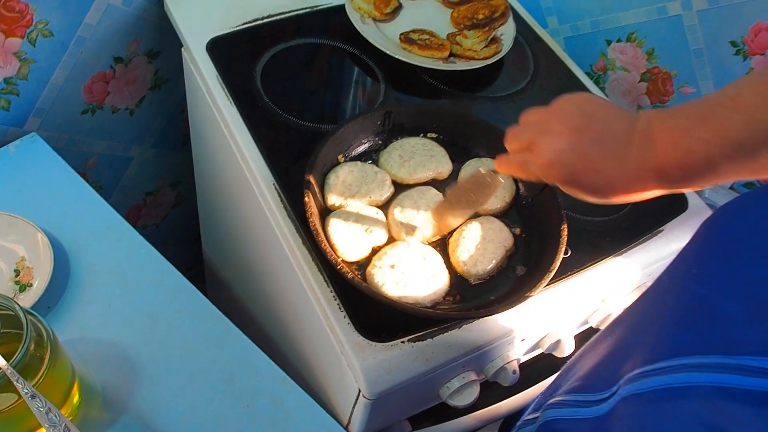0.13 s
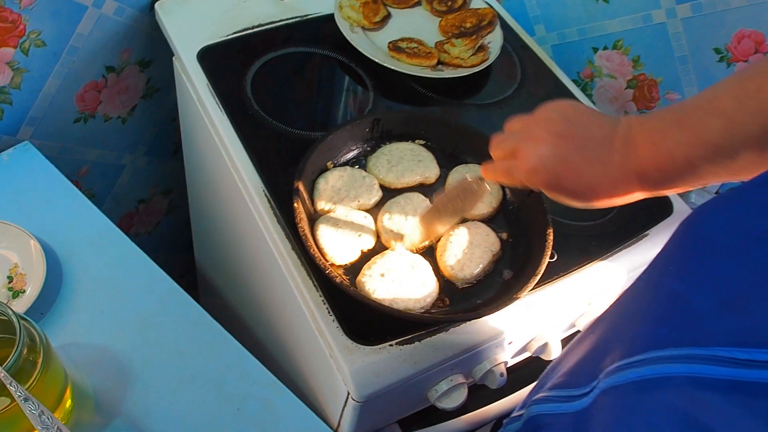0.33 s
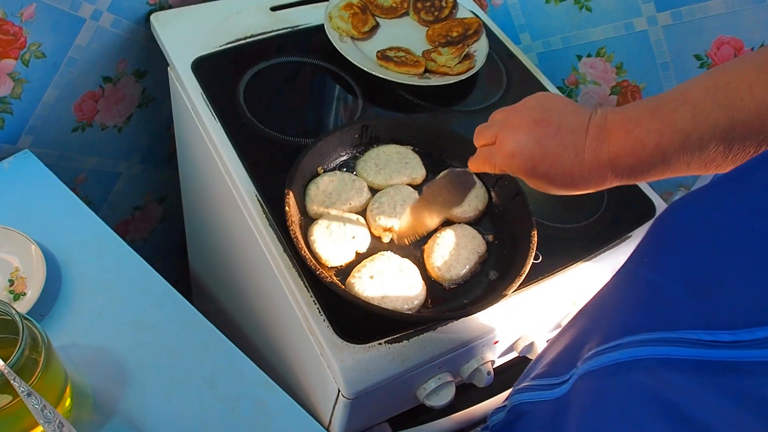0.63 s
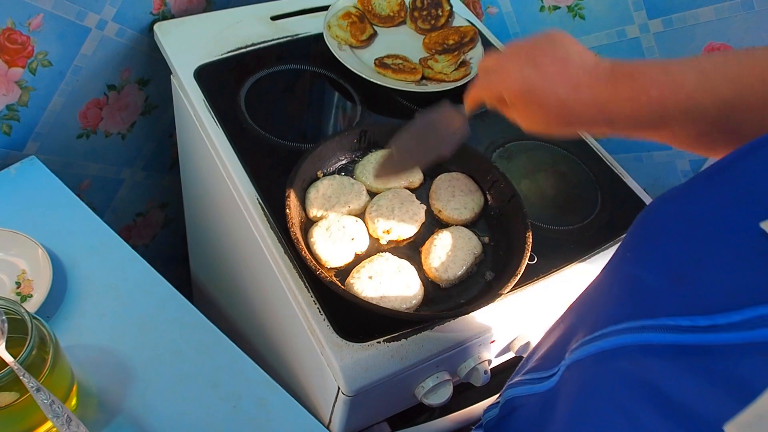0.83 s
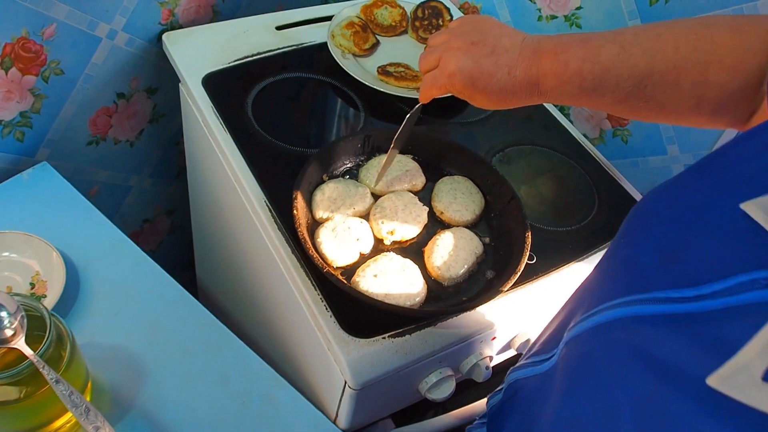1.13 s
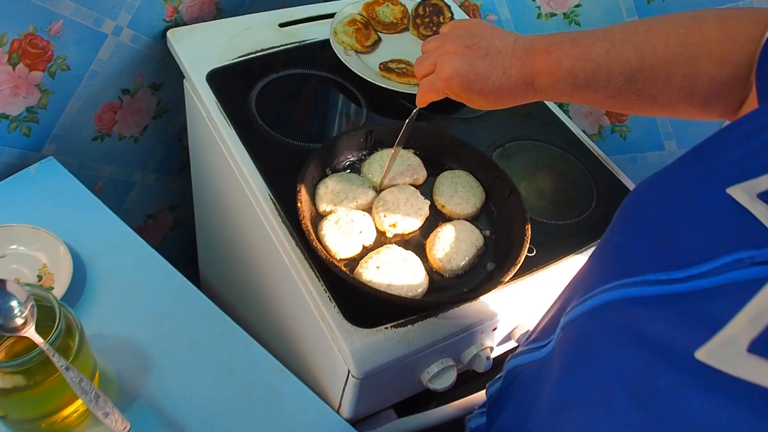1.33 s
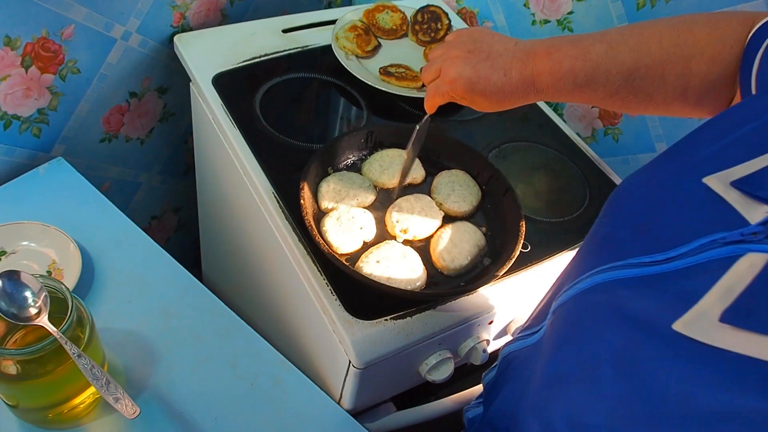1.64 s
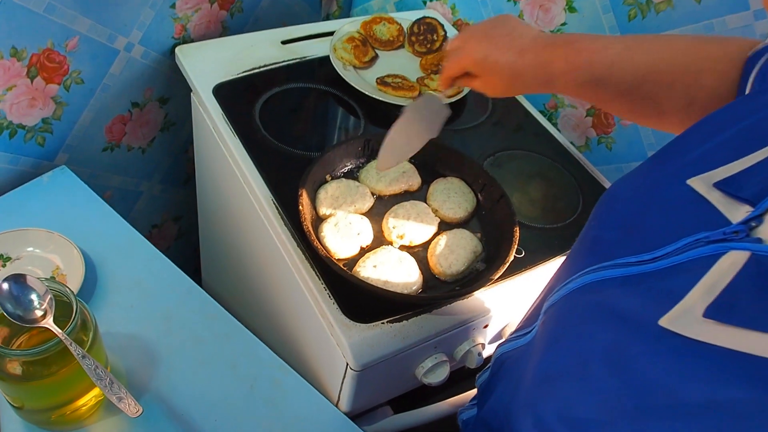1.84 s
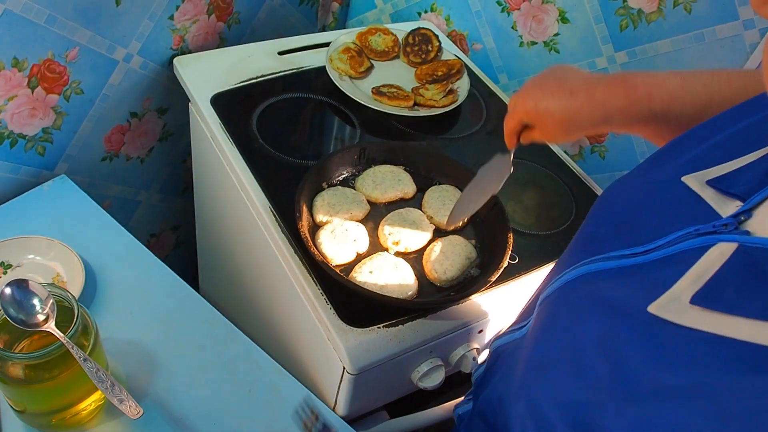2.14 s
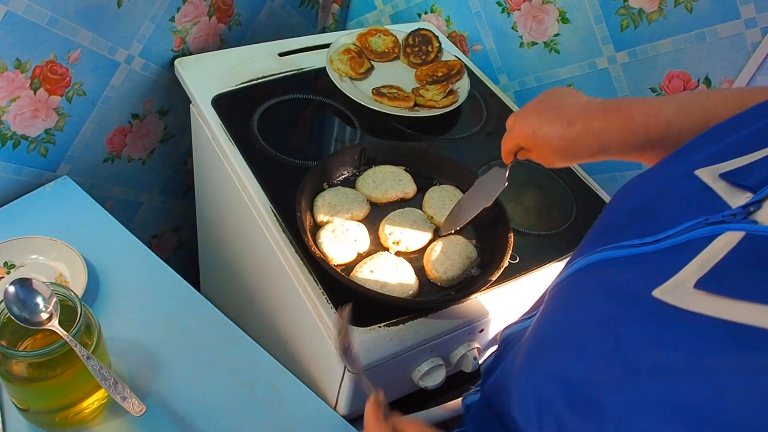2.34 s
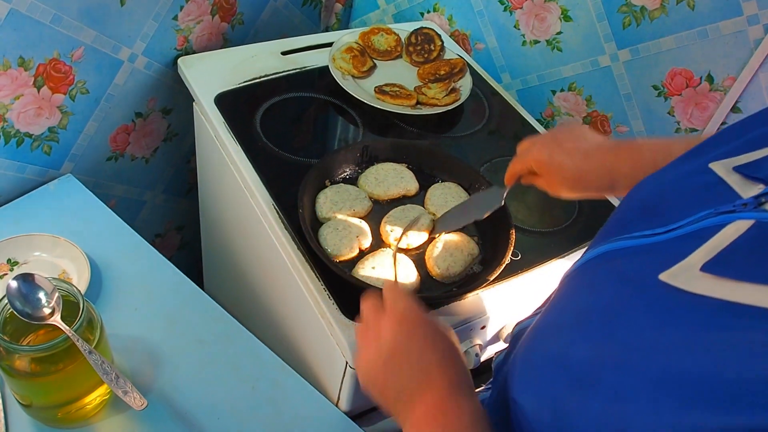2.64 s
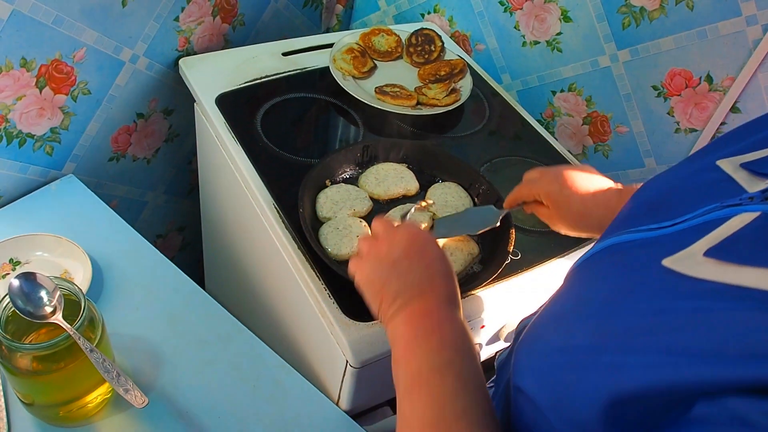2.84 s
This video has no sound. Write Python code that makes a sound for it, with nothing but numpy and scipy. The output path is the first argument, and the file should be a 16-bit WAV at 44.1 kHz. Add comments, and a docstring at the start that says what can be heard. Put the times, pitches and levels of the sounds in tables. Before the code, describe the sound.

Oil crackling in a metal frying pan, with light spatula scrapes and a utensil clink.

```python
"""A small hard kitchen, a stereo microphone close to the stove, where batter fries in a metal pan of oil.
Steam bubbles burst as sharp pops over a dense fine sizzle. A spatula scrapes to and fro and makes the pan
ring, knocks it once and slides; two utensils clink. Each sound comes back from the stove top and the
walls within a few milliseconds, and a quiet steady background lies under it all."""
import sys
import numpy as np
from scipy import signal
from scipy.fft import rfft, irfft
from scipy.io import wavfile
from scipy.ndimage import uniform_filter1d

SR = 44100
rng = np.random.default_rng(int(sys.argv[2]) if len(sys.argv) > 2 else 0)


def store_pcm(level_fs):
    """Save levels as 16-bit WAV."""
    pcm = np.round(np.clip(level_fs, -1, 1) * 32767).astype(np.int16)
    wavfile.write(sys.argv[1], SR, np.atleast_2d(pcm).T)


N = 132300  # 3 s

BODY_HZ, BODY_WIDTH_HZ = 3800, 1820  # the duller part of a bubble's burst
# Loud bubbles in the oil, close to the microphone.
# Each row: start in seconds, treble peak in dB, body level against the treble in dB.
POPS = [(0.092, -8.5, -17), (0.1296, -5, -15), (0.176, -12, -14), (0.2227, -7, -23), (0.2571, -9.5, -5),
        (0.276, -6.5, -15), (0.302, -9.5, -33), (0.3509, -7.5, -3), (0.3828, 0.5, -11), (0.491, -7.5, -19),
        (0.6518, -9.5, -3), (0.733, -10, -13), (0.8548, -15, -16), (0.8978, -14, -16), (0.9817, 0, -14),
        (1.059, -7, -17), (1.0786, -3, -19.5), (1.2335, -10.5, -2), (1.393, -14, -12), (1.4223, -11, -9),
        (1.4638, -10, -16), (1.505, -8, -11), (1.5506, 0.5, -19), (1.5959, -1.5, -14), (1.62, -7.5, -9.5),
        (1.715, -13.5, -7.5), (1.7654, -15.5, -3.5), (1.774, -9, -9), (1.798, -12.5, -7),
        (1.8502, -5, -9.5), (1.8665, -8, -16), (1.895, -14.5, -8), (1.9151, -9, -15), (1.989, -14, -10),
        (2.004, -14, -28), (2.035, -12, -7.5), (2.0791, -10, -22), (2.1496, -14, -10), (2.165, -14, -24),
        (2.2074, -9, -15), (2.3156, -8.5, -11), (2.3989, -8, -17), (2.424, -6, -18), (2.5196, -2, -13),
        (2.543, -11, -8), (2.548, -25, -10), (2.6612, -13, -10), (2.6963, -6, -11.5), (2.727, -6, -11),
        (2.7501, -3.5, -13), (2.888, -5.5, -11)]


def pops():
    """A steam bubble bursts as a bright click, a duller body and a faint thump, then sputters."""
    sputter_s, sputter_db = 0.01, -10.5
    out, impulse = np.zeros((2, N + 4096)), np.r_[1., np.zeros(511)]
    thump = band(impulse, 790, 1500)
    for start, db, body_db in POPS:
        bright = band(impulse, 11740 * np.exp(rng.uniform(-.032, .032)), 8740)
        body = band(impulse, BODY_HZ * np.exp(rng.uniform(0, .2)), BODY_WIDTH_HZ)
        shape = bright / bright.max() + undb(body_db) * body / body.max()
        shape += undb(db - 28.5) * thump / thump.max()  # the thump grows faster than the click
        lag = round(rng.uniform(-1, 1))
        sputter_times = sputter_s * rng.random() * rng.random(8)
        clicks = np.zeros(2048)
        np.add.at(clicks, (sputter_times * SR).astype(int), undb(sputter_db) * rng.uniform(-1, 1, 8))
        clicks[0] = 1
        burst = stereo(np.r_[np.zeros(8), np.convolve(clicks, shape)], lag)
        i = int(start * SR) - 8
        out[:, i:i + burst.shape[1]] += undb(db) * burst
    return out[:, :N]


# How lively the oil is across the pan. Each row: time in seconds, relative level in dB.
SIZZLE_LEVELS = [(0, -34), (.35, -52), (.7, -33), (.82, -39.5), (.96, -82), (1.1, -37.5), (1.2, -39),
                 (1.4, -31.5), (1.6, -53), (1.74, -34), (1.79, -25.5), (1.95, -33), (2.05, -28), (2.2, -35),
                 (2.28, -35.5), (2.45, -33), (2.62, -34), (2.74, -32.5), (2.82, -37), (3, -30.5)]


def sizzle():
    """Countless small bubbles burst in clusters all over the pan; the finest merge into a hiss."""
    clusters = undb(4 * wander(per_s=40))
    clicks = sum(stereo(random_clicks(per_s=400), lag) for lag in (-1, 0, 1)) * clusters
    bubbles = unit(clicks) + undb(-14.5) * rng.standard_normal((2, N))
    bright = unit(band(bubbles, 11550, 7600))
    body = unit(band(bubbles, BODY_HZ, BODY_WIDTH_HZ))
    level_db = np.interp(np.arange(N) / SR, *np.transpose(SIZZLE_LEVELS)) - 2.5
    return (bright + undb(-12) * body) * undb(level_db)


# The pan's modes, heard from close by. Each row: frequency in Hz, width in Hz,
# relative level in dB when rubbed on its floor, the same when touched near the rim.
PAN_MODES = [(721, 57, -17, -9.5), (980, 15, -18.5, -27), (1373, 16, -24, -6.5), (1424, 24, -21, -5.5),
             (1453, 39, 0.5, -7), (1561, 90, -10, -14), (1695, 210, -16, -23), (1695, 150, -9.5, -15),
             (1923, 120, -13, -9.5), (2224, 53, -12, -1), (2460, 55, -14, -22), (2970, 78, -10.5, -15),
             (3224, 110, -10, -5), (3577, 26, 0.5, -34), (4372, 29, 0, -27), (4750, 45, -39, -46)]
# Spatula strokes in the pan. Each row: peak time, rise and fall in seconds, level in dB,
# share of the high modes in dB.
STROKES = [(0, 0.023, 0.02, -40, -10), (0.082, 0.068, 0.023, -34.5, -9.5), (0.168, 0.047, 0.02, -28.5, -22),
           (0.272, 0.039, 0.019, -29.5, -3.5), (0.368, 0.044, 0.021, -21, -10.5),
           (0.436, 0.0056, 0.018, -34, -19), (0.479, 0.028, 0.014, -25.5, -3),
           (0.568, 0.044, 0.02, -19.5, -1.5), (0.671, 0.063, 0.046, -29.5, -4),
           (1.021, 0.024, 0.025, -47, -2), (1.653, 0.05, 0.05, -35.5, -2.5)]


def spatula_scrapes(at_rim):
    """The blade speeds up and slows in each stroke, catching on grit that rasps and rings the pan."""
    rim_from_s, high_from_hz = 1.5, 2800
    t, low, high = np.arange(N) / SR, 0, 0
    for peak, rise, fall, db, high_db in STROKES:
        if (peak > rim_from_s) == at_rim:
            speed = undb(db) * np.exp(-2 * ((t - peak) / np.where(t < peak, rise, fall)) ** 2)
            low += speed
            high += speed * undb(high_db)
    grit = random_clicks(per_s=4000)
    rasp = undb(-6) * band(grit * low, 2500, 2200) + undb(-14.5) * band(grit * high, 2130, 5000)
    ringing = 0
    for hz, width, floor_db, rim_db in PAN_MODES:
        push = grit * (high if hz > high_from_hz else low)
        gain = undb((rim_db if at_rim else floor_db) + 8.5) * np.sqrt(width / SR)
        ringing += gain * ring(push, hz, width)
    return rasp + ringing


# One knock near the pan's rim, in two quick contacts. Each row: start in seconds, level in dB.
KNOCK_CONTACTS = [(1.5258, -10), (1.5315, -16)]


def spatula_knock():
    """A hard knock on the pan favours its higher modes."""
    tilt_db_per_octave = 6
    modes = [(hz, width, rim_db + tilt_db_per_octave * np.log2(hz / 1500))
             for hz, width, _, rim_db in PAN_MODES]
    return strike(KNOCK_CONTACTS, modes, rattle_s=0.0032)


# The utensils' modes. Each row: frequency in Hz, width in Hz, relative level in dB.
UTENSIL_MODES = [(1097, 51, -2), (2120, 94, -9), (2225, 65, -2.5), (3186, 113, 4.5), (3635, 86, -0.5),
                 (4743, 105, -0.5), (6990, 50, 1), (8260, 57, -6), (8730, 75, -1), (10400, 88, -5.5),
                 (13200, 150, 3)]
# Utensils meeting near the microphone. Each row: start in seconds, level in dB.
CLINKS = [(2.4813, -13), (2.4845, -23.5), (2.4945, -22.5), (2.6823, -22)]


def utensil_clinks():
    """Two metal utensils touch briefly and ring."""
    return strike(CLINKS, UTENSIL_MODES, rattle_s=0.00087)


# The stove top and walls, as their echoes reach the microphone.
# Each row: delay in seconds, smear in seconds, relative level in dB.
ECHOES = [(.0026, 0.0006, -3.5), (.0072, 0.00023, -8), (0.0119, 0.00025, -13), (0.02, 0.00075, -19.5)]


def kitchen(x):
    """Hard surfaces add smeared echoes, an early scatter and a tail; the lows are alike left and right."""
    t = np.arange(int(.5 * SR)) / SR

    def decay(t60, delay):
        return (t > delay) * np.exp(-np.log(1000) * np.maximum(t - delay, 0) / t60) / np.sqrt(t60 * SR / 14)

    alike_below_hz = 3860
    noise = rng.standard_normal((2, 3, len(t)))
    shared, separate = noise[:, :1], noise[:, 1:]
    early, late = lowpass(shared, alike_below_hz) + separate - lowpass(separate, .37 * alike_below_hz)
    scatter = undb(-9) * decay(t60=0.037, delay=0.00286)
    echoes = sum(undb(db) * decay(7 * smear, delay) for delay, smear, db in ECHOES)
    dull = lowpass(late, 5000)
    tail = dull * decay(t60=0.61, delay=0.027) + (late - dull) * decay(t60=0.27, delay=0.016)
    response = early * (scatter + echoes) + undb(-9) * tail
    response[:, 0] = 1  # direct sound
    return signal.fftconvolve(x, flatten(response), axes=1)[:, :N]


# Room tone all around the microphone. Each row: frequency in Hz, relative spectral density in dB.
ROOM_TONE = [(20, -10), (50, -10), (120, -7.5), (600, -3), (2400, -3), (5400, -5.5), (16000, -7.5)]


def room_tone():
    """A quiet steady noise, partly alike in both channels."""
    hz, (row_hz, row_db) = np.arange(N // 2 + 1) * SR / N, np.transpose(ROOM_TONE)
    gain = undb(np.interp(np.log(hz + 1), np.log(row_hz), row_db))
    mid, side = unit(irfft(rfft(rng.standard_normal((2, N))) * gain, N))
    return undb(-44.5) * (mid + undb(-5) * side * np.array([[1], [-1]]))


def strike(contacts, modes, rattle_s):
    """A hard tap and a short rattle after it ring the metal's modes and make a crack."""
    push, t = np.zeros(N), np.arange(2000) / SR
    for start, db in contacts:
        i = int(start * SR)
        rattle = rng.standard_normal(len(t)) * np.exp(-t / rattle_s) / np.sqrt(rattle_s * SR)
        push[i:i + len(t)] += undb(db + 5) * rattle
        push[i] += undb(db)
    ringing = sum(undb(db - 12.5) * ring(push, hz, width) for hz, width, db in modes)
    crack = undb(-8.5) * band(push, 2375, 2400)
    return ringing + crack


def ring(x, hz, width):
    """One mode: a damped resonance, width in Hz."""
    radius, angle = np.exp(-np.pi * width / SR), 2 * np.pi * hz / SR
    return signal.lfilter([.5, 0, -.5], [1, -2 * radius * np.cos(angle), radius * radius], x)


def random_clicks(per_s, scatter_db=7.5):
    """Random clicks, a few far larger than the rest; rms 1."""
    hits = rng.random(N) < per_s / SR
    signs = rng.choice([-1., 1.], N)
    sizes = undb(scatter_db * np.minimum(rng.exponential(size=N), 3))
    return unit(hits * signs * sizes)


def wander(per_s):
    """Random levels, each held briefly, then smoothed."""
    hold = int(SR / per_s)
    return uniform_filter1d(np.repeat(rng.standard_normal(N // hold + 1), hold), hold // 2)[:N]


def stereo(x, lag):
    """Sound from one side reaches the two microphone ports lag samples apart."""
    return np.array([x, np.roll(x, lag)])


def flatten(response, smooth_hz=200):
    """Takes the broad colour out of a response with a causal filter, leaving its timing."""
    spectrum, n = rfft(response), response.shape[1]
    power = uniform_filter1d(np.abs(spectrum) ** 2, size=int(smooth_hz * n / SR))
    cepstrum = irfft(np.log(power / power.mean()) / 2)
    cepstrum[:, 1:n // 2] *= 2  # fold to minimum phase
    cepstrum[:, n // 2:] = 0
    return irfft(spectrum / np.exp(rfft(cepstrum)))


def band(x, hz, width):
    edges = [max(hz - width / 2, 20), min(hz + width / 2, .45 * SR)]
    return signal.sosfilt(signal.butter(2, edges, "bandpass", fs=SR, output="sos"), x)


def lowpass(x, hz):
    return signal.sosfilt(signal.butter(1, hz, fs=SR, output="sos"), x)


def undb(db):
    return 10 ** (np.asarray(db) / 20)


def unit(x):
    return x / np.sqrt(np.mean(x ** 2, axis=-1, keepdims=True))


def scene():
    """Oil and metal close to the microphone, the kitchen around them."""
    metal = spatula_knock() + spatula_scrapes(at_rim=False) + spatula_scrapes(at_rim=True)
    metal += utensil_clinks()
    metal = signal.sosfilt(signal.butter(4, 610, "highpass", fs=SR, output="sos"), metal)
    return kitchen(pops() + sizzle() + metal) + room_tone()


def record(dry):
    """Peaks are rounded; the top drops in a step, then is cut; the converter sits slightly off zero."""
    treble_step = signal.ellip(5, .5, 25, 15650, fs=SR, output="sos")
    steep_cut = signal.ellip(12, .2, 90, 16500, fs=SR, output="sos")
    softened = signal.sosfilt(treble_step, np.tanh(dry))
    return signal.sosfilt(steep_cut, softened) - .0025


dry = scene()
out = record(dry)
store_pcm(out)
```